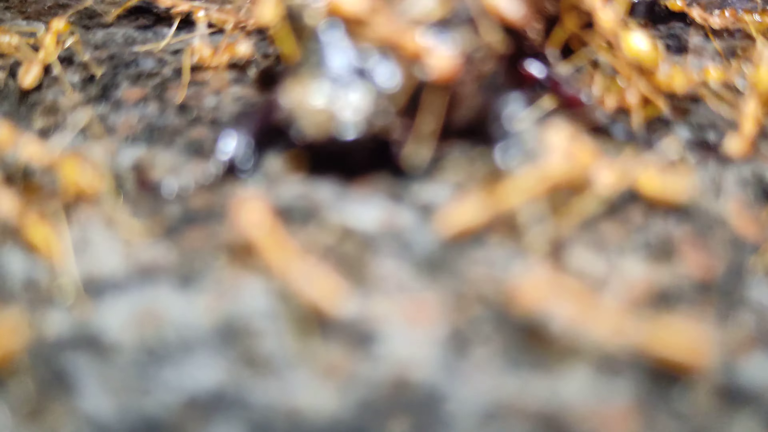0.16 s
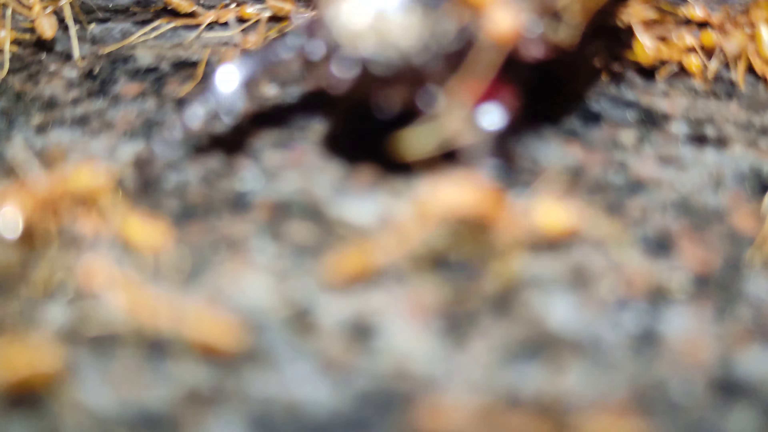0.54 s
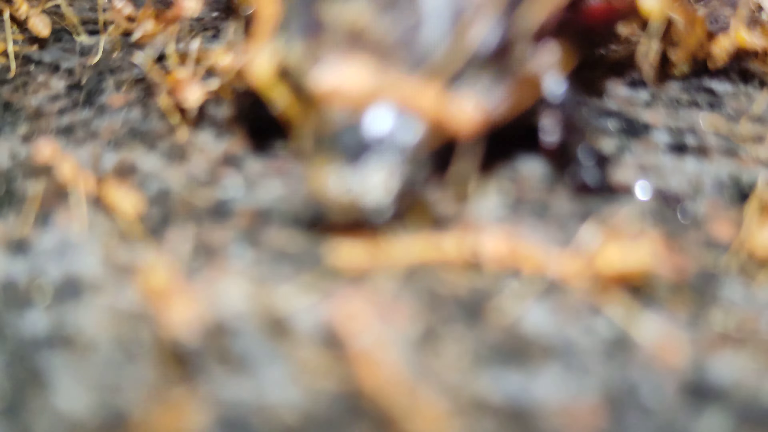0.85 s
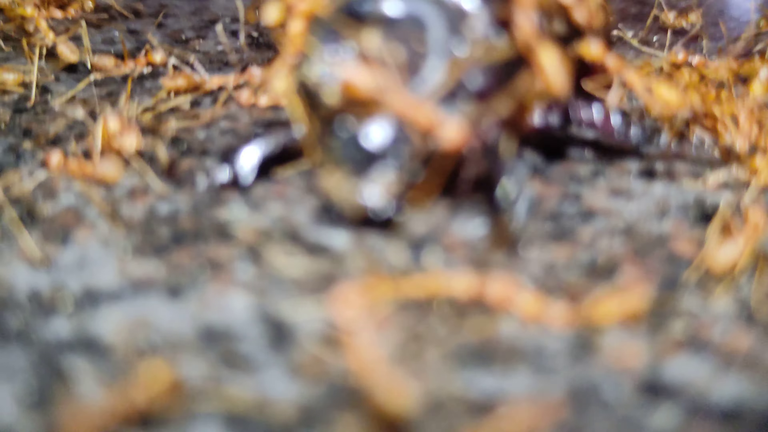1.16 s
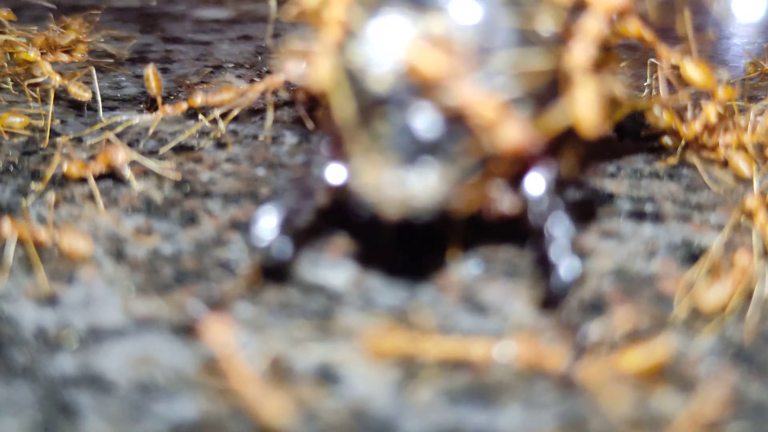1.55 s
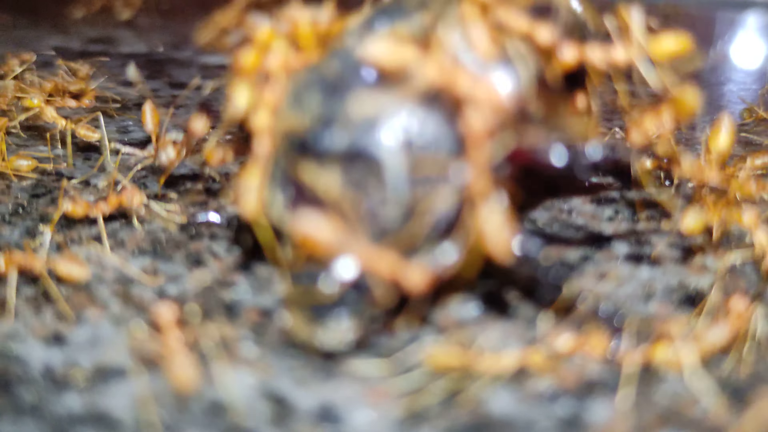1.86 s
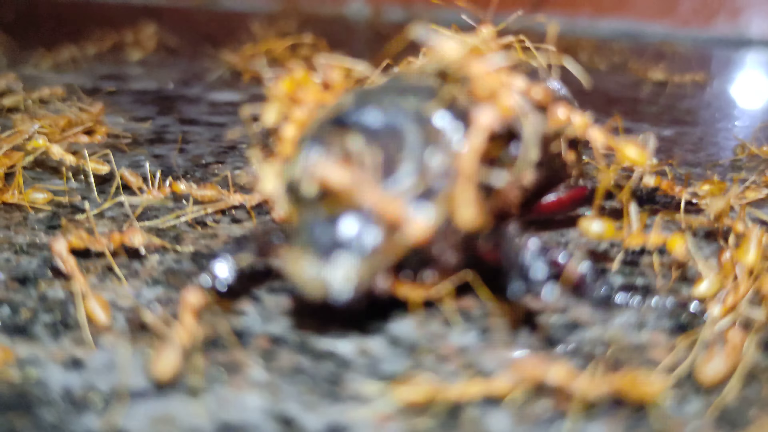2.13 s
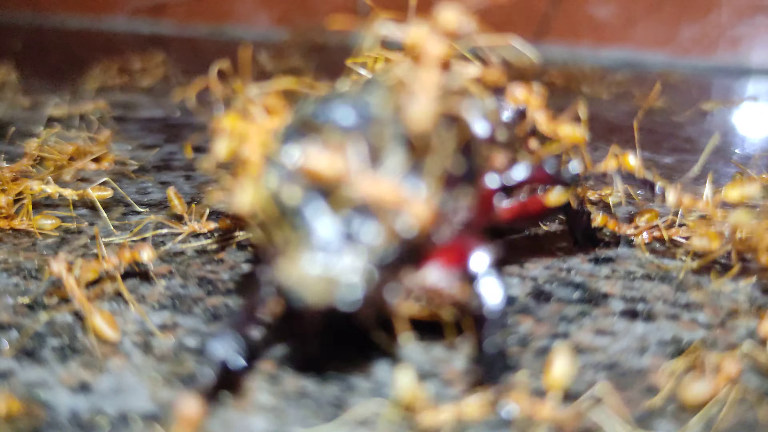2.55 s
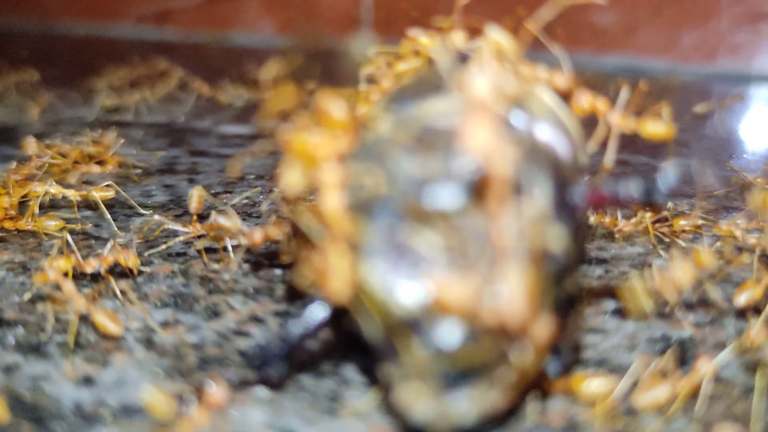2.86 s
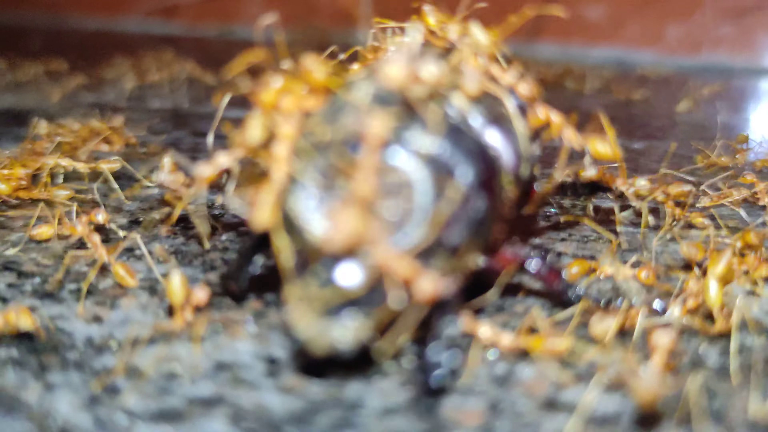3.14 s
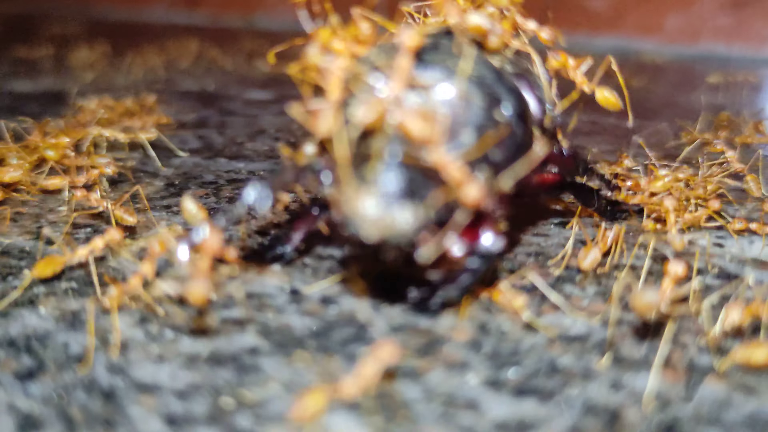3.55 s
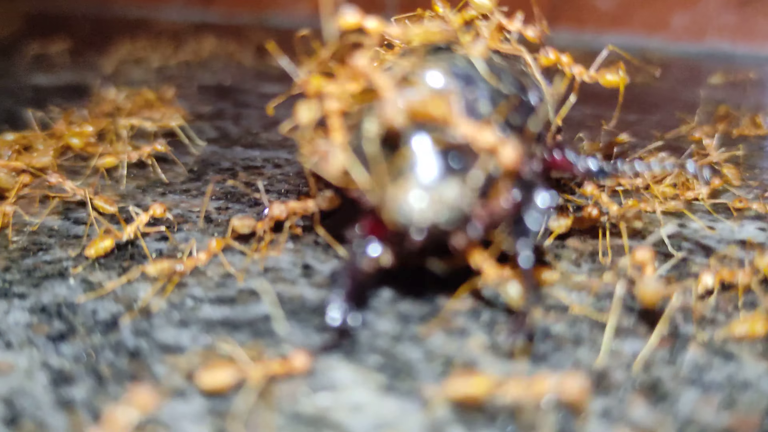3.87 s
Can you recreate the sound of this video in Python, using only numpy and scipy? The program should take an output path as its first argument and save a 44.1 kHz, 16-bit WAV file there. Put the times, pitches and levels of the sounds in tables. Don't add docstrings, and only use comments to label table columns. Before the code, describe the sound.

A beetle's hard body scrapes and crackles over stone, loud near three seconds, over throbbing night crickets.

```python
import sys
import numpy as np
from scipy import signal
from scipy.fft import rfft, irfft
from scipy.io import wavfile
from scipy.ndimage import uniform_filter1d

SR = 44100
rng = np.random.default_rng(int(sys.argv[2]) if len(sys.argv) > 2 else 0)


def persist_wave(psi):
    counts = np.round(np.clip(psi, -1, 1) * 32767).astype(np.int16)
    wavfile.write(sys.argv[1], SR, np.atleast_2d(counts).T)


def volts_from_decibels(level):
    exponent = np.asarray(level, float) / 20
    return 10 ** exponent


N = 176400


def evened(x):
    return x / np.sqrt(np.mean(x ** 2) + 1e-20)


def peaked(x):
    return x / abs(x).max()


def read(points, hz):
    f, value = np.transpose(points)
    return np.interp(np.log(hz + 1), np.log(f + 1), value)


def add(mix, s, sound):
    part = mix[:, round(s * SR):][:, :sound.shape[1]]
    part += sound[:, :part.shape[1]]


def resonate(x, hz, width):
    turn = np.exp(2j * np.pi * np.cumsum(hz * np.ones(x.shape[-1])) / SR)
    r = np.exp(-np.pi * width / SR)
    return 2 * (turn * signal.lfilter([1 - r], [1, -r], x / turn + 1e-18)).real


def coloured(x, spectrum):
    gain = volts_from_decibels(read(spectrum, np.fft.rfftfreq(len(x), 1 / SR)))
    return evened(irfft(rfft(x) * gain, len(x)))


def drift(seconds, length):
    size = round(seconds * SR)
    once = uniform_filter1d(rng.standard_normal(length), size)
    return evened(uniform_filter1d(once, size))


def panned(x, pan_db):
    lag = 18
    smear = rng.standard_normal(200) * volts_from_decibels(-np.arange(200) * .3 - 14)
    smear[0] += 1
    path = np.r_[np.zeros(lag), smear / np.linalg.norm(smear)]
    left = np.convolve(x, path)[:len(x)]
    return 2 * np.array([volts_from_decibels(pan_db) * left, x]) / np.sqrt(1 + volts_from_decibels(2 * pan_db))


# f/Hz, level/dB
AIR_SPECTRUM = [(18, -51), (30, -31.5), (165, -1), (1220, -19.5), (4530, -27), (5740, -28.5), (6720, -11.5),
                (13700, -47.5), (16000, -59)]
# f/Hz, left-right correlation/1
COHERENCE = [(60, 0.53), (380, 0.72), (2380, -0.58), (15000, 0.54)]


def air():
    frames, hz = N // 256 + 5, np.fft.rfftfreq(1024, 1 / SR)
    a, b, c, d, patches = rng.standard_normal((frames, 513, 5)).T
    patches = uniform_filter1d(patches, size=8, axis=0)
    patches = evened(uniform_filter1d(patches, size=12, axis=1))
    same = np.clip(read(COHERENCE, hz), -1, 1)[:, None]
    left, other = a + 1j * b, c + 1j * d
    z = np.array([left, same * left + np.sqrt(1 - same ** 2) * other])
    z = z * volts_from_decibels(read(AIR_SPECTRUM, hz)[:, None] + 0.62 * patches)
    return volts_from_decibels(-54.5) * evened(signal.istft(z, nperseg=1024, noverlap=768)[1][:, :N])


# f/Hz, bandwidth/Hz, level/dB, left-right level/dB
CHORUS_PARTIALS = [(6770, 260, -67, -6), (13420, 1800, -77.5, 2), (4400, 820, -76, -0.5),
                   (9500, 260, -83.5, 12.5), (11650, 420, -82, 1)]


def chorus():
    out = np.zeros((2, N))
    for hz, width, db, pan_db in CHORUS_PARTIALS:
        throb = volts_from_decibels(1.2 * drift(0.024, N) + 0.21 * drift(0.068, N))
        band = resonate(resonate(rng.standard_normal((2, N)), hz, width), hz, width)
        side_db = pan_db * np.array([[.5], [-.5]])
        out += volts_from_decibels(db + 3.0 + side_db) * evened(band) * throb
    return out


# t/s, duration/s, level/dB, top f/Hz
KATYDID_PHRASES = [
    (0.07, 0.41, -64.5, 8170),
    (0.568, 0.43, -49, 8330),
    (1.301, 0.6, -61, 8030),
    (1.577, 0.4, -49.5, 8330),
    (2.054, 0.41, -63.5, 8120),
    (2.582, 0.37, -48.5, 8316),
    (3.548, 0.44, -51.5, 8250),
]


def katydid(start, length, db, top_hz):
    strokes_per_s, stroke_jitter, uneven_db = 160, .12, 1.5
    wing_width_hz, sag_hz = 350, 234
    u = np.arange(0, 1.2 * length, 1 / SR) / length
    size = len(u)
    effort = np.clip(u / 0.29, 0, 1) * np.clip((1.12 - u) / 0.47, 0, 1)
    sag = np.clip(1 - u / 0.23, 0, 1) + np.clip((u - .55) / 0.2, 0, 1)
    hz = top_hz - sag_hz * sag
    turns = np.cumsum(strokes_per_s * (1 + stroke_jitter * drift(0.00312, size))) / SR
    tooth_hz = top_hz + 100 - 120 * np.exp(-u / 0.1192) + 30 * drift(0.0069, size)
    carrier = np.cos(2 * np.pi * np.cumsum(tooth_hz) / SR)
    drive = carrier * np.exp(-(turns % 1) / 0.11) * volts_from_decibels(uneven_db * drift(0.0076, size))
    drive = evened(drive) + 5.4 * rng.standard_normal(size)
    wing = resonate(resonate(drive, hz + 80, wing_width_hz * 2), hz - 60, wing_width_hz * 2.8)
    core = resonate(resonate(drive, hz + 140, 160), hz + 140, 160)
    wing = evened(wing) + 0.68 * evened(core)
    wing = signal.sosfilt(signal.butter(14, top_hz + 240, fs=SR, output="sos"), wing)
    return start, panned(volts_from_decibels(db) * effort ** 0.59 * evened(wing), -8.5)


# t/s, f/Hz, level/dB
TREE_CRICKET_CHIRPS = [
    (.29, 3406, -63),
    (1.452, 3400, -61.5),
    (2.152, 3200, -69.5),
    (2.582, 3410, -62.5),
]


def tree_cricket(start, hz, db):
    syllable_s, gap_s, syllable_drop_db, glide_hz = 0.045, 0.088, -2, 56.2
    echo_s, echo_db = 0.042, -9
    t, tone = np.arange(0, .45, 1 / SR), 0
    waver = 9 * drift(.01, len(t))
    for k in range(5):
        for late_s, late_db, skew in ((0, 0, 1.5), (echo_s, echo_db + 1.0 * k, .9)):
            u = np.clip((t - k * gap_s - late_s) / syllable_s, 0, 1)
            glide = (1 - u) ** 2 if late_s == 0 else .45
            pitch = hz + waver + glide_hz * glide
            swell = abs(np.sin(np.pi * u ** skew)) ** 0.48
            level = volts_from_decibels(syllable_drop_db * k ** 2.1 + late_db) * swell
            tone = tone + level * np.sin(2 * np.pi * np.cumsum(pitch) / SR)
    return start, volts_from_decibels(db + 8 + 2.9 * drift(0.0026, len(t))) * np.array([0.64 * tone, tone])


# t/s, peak level/dB, left-right level/dB, knock level/dB, brightness/dB
LEG_TICKS = [(0.6, -35, -17, -9, 5), (.7497, -33, -14, -12, -12), (0.7622, -34.5, -17, 10, -22),
             (.8419, -39, -11, 1, -22), (0.9294, -30, -8, -7, -8), (0.9382, -20, -2, 2, -18),
             (0.9403, -23.5, -11, 3, -5), (1.6433, -38, -11, -23, 0), (2.0474, -25.5, -19, -23, 2),
             (2.0728, -24.5, -20, -20, -2), (2.1178, -29, -23, -21, -2), (2.1236, -25, -22, -35, 2),
             (2.1739, -37, -7, -9, 2), (2.2116, -36, -8, -8, 1), (2.8575, -36.5, -13, -11, -27),
             (3.476, -25.5, -12, -6, 0), (3.8087, -15, -21, -27, -2)]
# f/Hz, bandwidth/Hz, level/dB, share of brightness/1
SHELL_MODES = [(6000, 1450, 2, 0), (7470, 2700, -2.5, 0.6), (9370, 2130, -3, 1), (14260, 2600, -4.5, 0.9),
               (3630, 2300, -19.5, -.7)]
# f/Hz, bandwidth/Hz, level/dB
GROUND_MODES = [(1250, 300, 5), (690, 440, -3), (407, 144, -5), (89, 140, -49)]


def tick(s, db, pan_db, knock_db, bright_db):
    crack_s, mode_spread, lead_s = 0.00036, 0.14, .001
    t = np.arange(1500) / SR - lead_s
    blow = np.arange(len(t)) == 44
    burst = blow + 0.22 * rng.standard_normal(len(t)) * np.exp(-abs(t) / crack_s)
    crack = 0
    for k, (hz, width, level_db, share) in enumerate(SHELL_MODES):
        detuned = hz * (1 + mode_spread * rng.uniform(-0.89, 1))
        ring = peaked(resonate(burst, detuned, width))
        crack = crack + (-1) ** k * volts_from_decibels(level_db + share * bright_db) * ring
    push = blow + 0.12 * rng.standard_normal(len(t)) * np.exp(-t / 0.0022) * (t > 0)
    knock = sum(volts_from_decibels(level_db) * peaked(resonate(push, hz, width)) for hz, width, level_db in GROUND_MODES)
    sound = peaked(crack) + volts_from_decibels(knock_db) * peaked(knock)
    return s - lead_s, panned(volts_from_decibels(db - 6) * sound, pan_db)


# t/s, peak level/dB, f/Hz, bandwidth/Hz
DULL_BUMPS = [
    (0.7632, -29, 400, 198),
    (0.769, -33, 800, 500),
    (0.933, -31, 1230, 500),
    (.9398, -26.5, 730, 250),
    (1.035, -33.5, 1000, 500),
    (3.7195, -28.5, 805, 296),
]


def bump(s, db, hz, width):
    push = np.r_[np.hanning(20), np.zeros(1500)]
    return s, panned(volts_from_decibels(db - 5.5) * peaked(resonate(push, hz, width)), -17.5)


def slips(size, slips_per_s, spread_db):
    sizes = volts_from_decibels(spread_db * np.minimum(rng.exponential(1, size), 3.5))
    sizes = sizes * (rng.random(size) < slips_per_s / SR)
    return evened(sizes * rng.standard_normal(size)) + 1.0 * rng.standard_normal(size)


def stroke(curve, spectrum, pan_db, slips_per_s, spread_db, lumpy_db):
    s, db = np.transpose(curve)
    level_db = np.interp(np.arange(s[0], s[-1], 1 / SR), s, db)
    size = len(level_db)
    grit = slips(size, slips_per_s, spread_db) * volts_from_decibels(lumpy_db * drift(0.0018, size))
    grit = grit * volts_from_decibels(1.6 * drift(0.0098, size))
    return s[0], panned(coloured(grit, spectrum) * volts_from_decibels(level_db), pan_db)


# t/s, duration/s, level/dB
LIGHT_SCRAPES = [
    (.845, .11, -51),
    (.975, .073, -50.5),
    (1.305, .085, -57),
    (2.03, .27, -68),
]
# f/Hz, level/dB
SCRAPE_SPECTRUM = [(120, -23), (250, -14), (1500, -6), (4000, -7.5), (7140, -10), (8300, -15.5),
                   (14600, -19), (16000, -39)]


def scrape(s, length, db):
    shape = [(s, db - 14), (s + .015, db - 3), (s + .8 * length, db), (s + length, db - 6)]
    return stroke(shape, SCRAPE_SPECTRUM, -18.5, slips_per_s=4600, spread_db=-6.0, lumpy_db=1.0)


# t/s, level/dB
DRAG_EFFORT = [
    (2.869, -63),
    (2.895, -46.5),
    (2.955, -45),
    (2.964, -42.5),
    (3.01, -44),
    (3.069, -36),
    (3.12, -31.5),
    (3.127, -42),
    (3.166, -38.5),
               (3.194, -30.5),
    (3.203, -33.5),
    (3.29, -27),
    (3.328, -25.5),
    (3.338, -33),
    (3.4, -31.5),
    (3.438, -37),
    (3.448, -43),
    (3.5, -55.5),
]
# f/Hz, bandwidth/Hz, level at light effort/dB, level at full effort/dB
BODY_MODES = [(320, 700, -40, -20.5), (1320, 920, -10.5, -10.5), (3485, 2180, 1.5, -8),
              (5390, 2170, 1, 0.5), (6630, 850, -16.5, -9), (8500, 3000, -8.5, -5),
              (12340, 2100, -12.5, -6), (14600, 1800, -11.5, -8.5)]


def drag():
    light_effort_db, full_effort_db = -44, -27
    s, db = np.transpose(DRAG_EFFORT)
    level_db = np.interp(np.arange(s[0], s[-1], 1 / SR), s, db)
    size = len(level_db)
    slow_db = uniform_filter1d(level_db, size=3000)
    full = np.clip((slow_db - light_effort_db) / (full_effort_db - light_effort_db), 0, 1)
    shared, out = slips(size, 2500, 2.5), 0
    for hz, width, light_db, full_db in BODY_MODES:
        lumps = volts_from_decibels(1.0 * drift(0.026, size) + 1.83 * drift(0.0037, size))
        drive = (0.26 * shared + slips(size, 1500, 1.3)) * lumps
        ring = resonate(resonate(drive, hz, width), hz, width)
        out = out + evened(ring) * volts_from_decibels(light_db + (full_db - light_db) * full)
    out = signal.lfilter(*signal.iirnotch(11300, 25, SR), out)
    return s[0], panned(evened(out) * volts_from_decibels(level_db), -43)


# t/s, peak level/dB, knock level/dB, brightness/dB
SHELL_CATCHES = [(2.9331, -19, -34, -7), (2.9493, -29, -23, -7), (2.9624, -16.5, -29, -13),
                 (3.0869, -16, -31, -8.5), (3.1198, -10, -17.5, -9), (3.122, -12.5, -15, -2),
                 (3.124, 1, -9.5, -11), (3.138, -11, -22, -4), (3.1508, -14, -6, -10),
                 (3.152, -3.5, -17, -12), (3.1532, -15, -11.5, -18), (3.161, -15, -19, -9),
                 (3.1847, -3.5, -18, 5), (3.1931, -5, -6.5, 8), (3.1965, -6.5, -10.5, 4),
                 (3.2244, -12.5, -22, -4), (3.2904, -7, -18, -1), (3.298, -14, -5.5, -6),
                 (3.3078, -9, -17, -1), (3.3255, -10, -15, 8), (3.3304, -3, -7.5, -7),
                 (3.3336, -1, -19, -6), (3.373, -10, -16, -8), (3.38, -12.5, -8.5, 1),
                 (3.3992, -10, -29, -3), (3.415, -12.5, -15, 4), (3.4432, 2.5, -15, 9)]


def catch(s, db, knock_db, bright_db):
    return tick(s, db, -28.5, knock_db, bright_db)


# t/s, level/dB
SHUFFLE_EFFORT = [
    (3.5, -54),
    (3.58, -46.5),
    (3.75, -54),
    (3.795, -48),
    (3.812, -60),
    (3.832, -54.5),
    (3.85, -46),
    (3.97, -49),
    (4.0, -51),
]
# f/Hz, level/dB
SHUFFLE_SPECTRUM = [(350, -11.5), (1000, -7), (2700, -9), (3600, -0.5), (6800, -5), (8800, -11.5),
                    (11800, -12), (16000, -14)]


def shuffle():
    return stroke(SHUFFLE_EFFORT, SHUFFLE_SPECTRUM, -28, slips_per_s=9000, spread_db=-0.5, lumpy_db=0.5)


def scene():
    mix = air() + chorus()
    events = ((katydid, KATYDID_PHRASES), (tree_cricket, TREE_CRICKET_CHIRPS), (tick, LEG_TICKS),
              (bump, DULL_BUMPS), (scrape, LIGHT_SCRAPES), (catch, SHELL_CATCHES))
    for source, table in events:
        for row in table:
            add(mix, *source(*row))
    add(mix, *drag())
    add(mix, *shuffle())
    return mix


def roll_off(x):
    return signal.sosfilt(signal.butter(12, 16620, fs=SR, output="sos"), x)


def record(dry):
    cut = signal.sosfilt(signal.butter(2, 52, "high", fs=SR, output="sos"), dry)
    mix = 1.096 * np.tanh(cut / 1.0)
    return roll_off(mix)


dry = scene()
out = record(dry)
persist_wave(out)
```